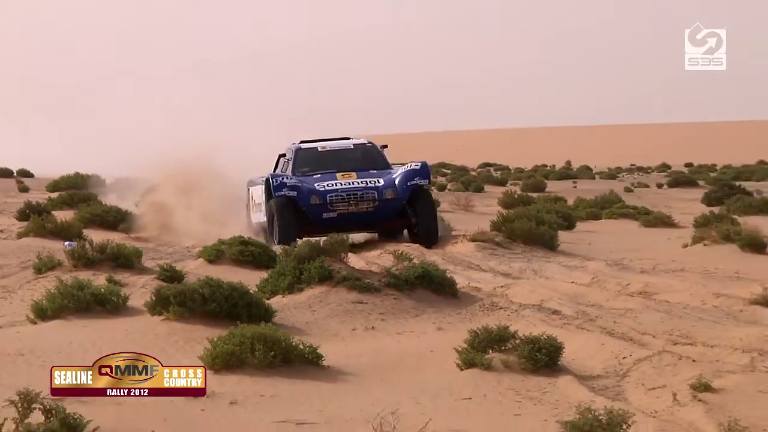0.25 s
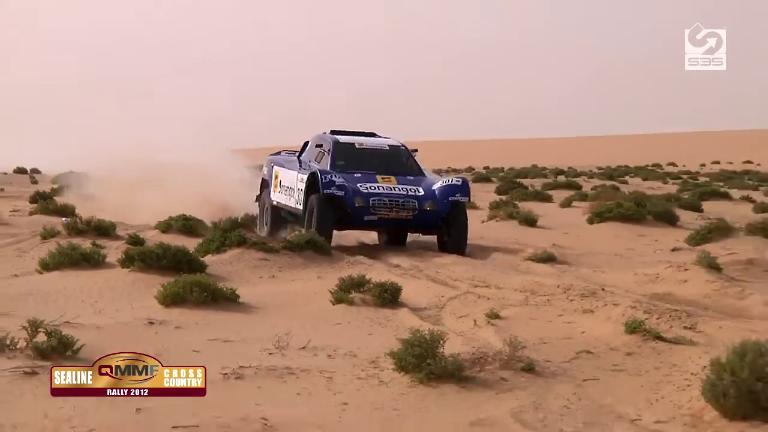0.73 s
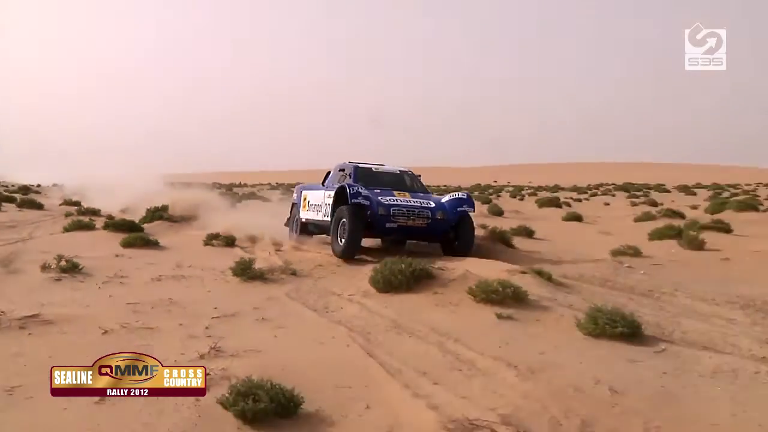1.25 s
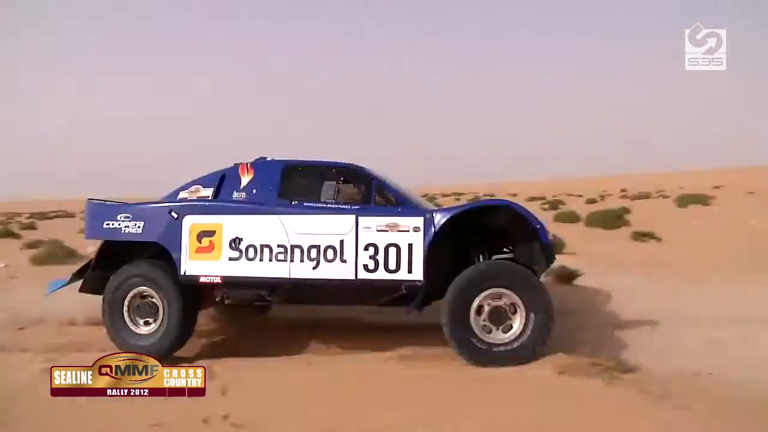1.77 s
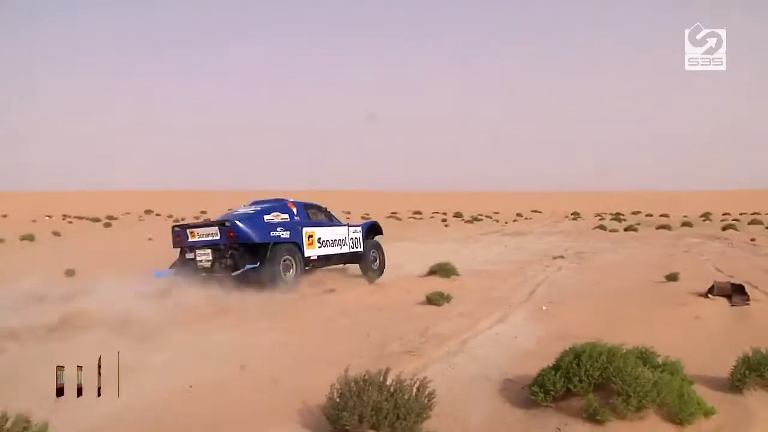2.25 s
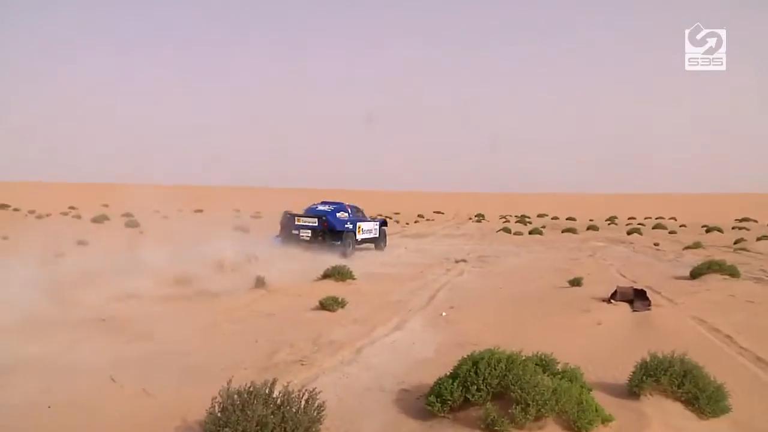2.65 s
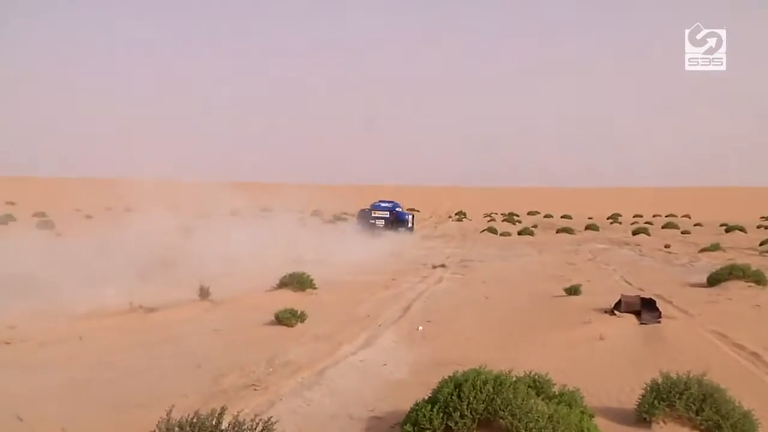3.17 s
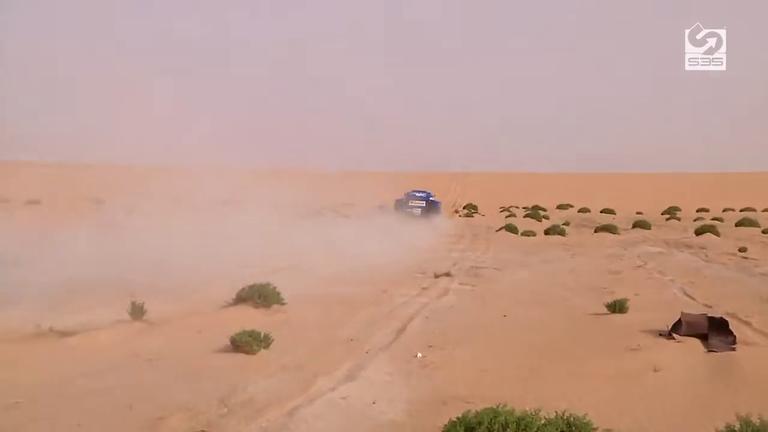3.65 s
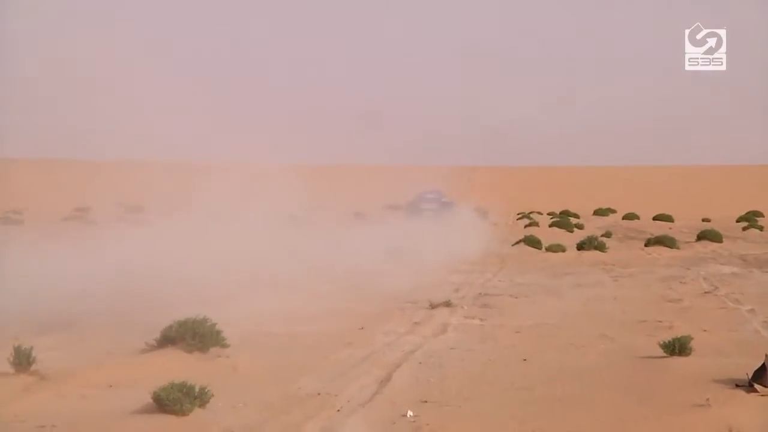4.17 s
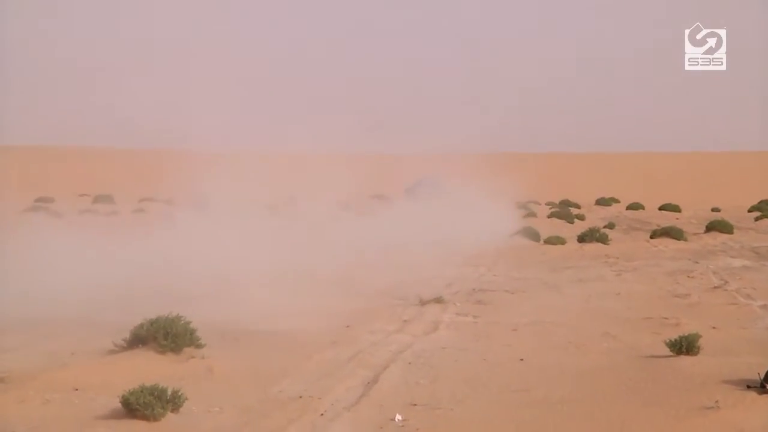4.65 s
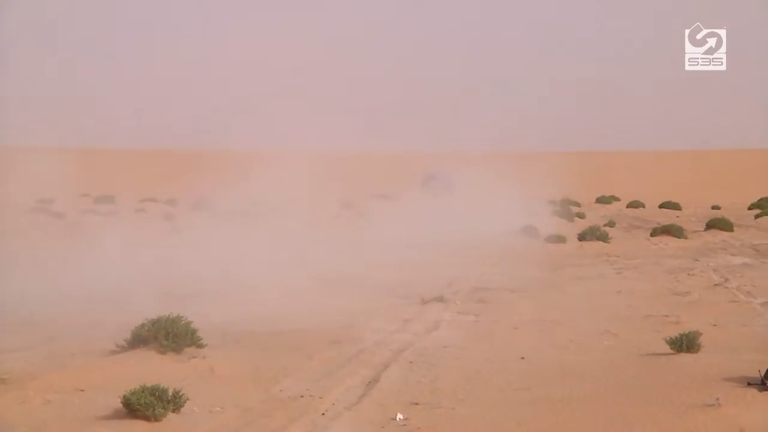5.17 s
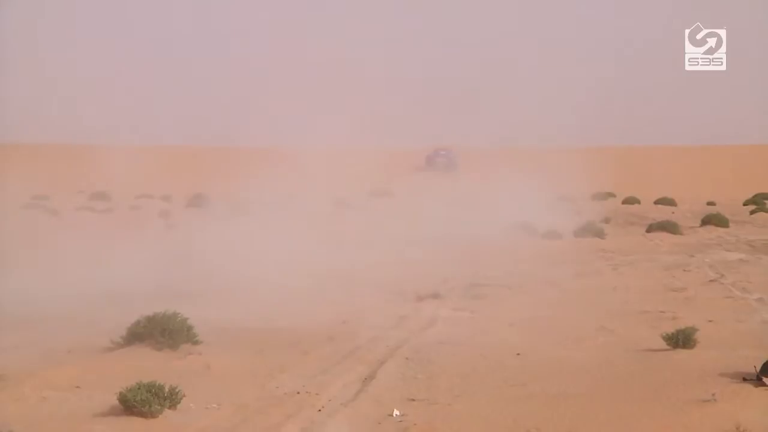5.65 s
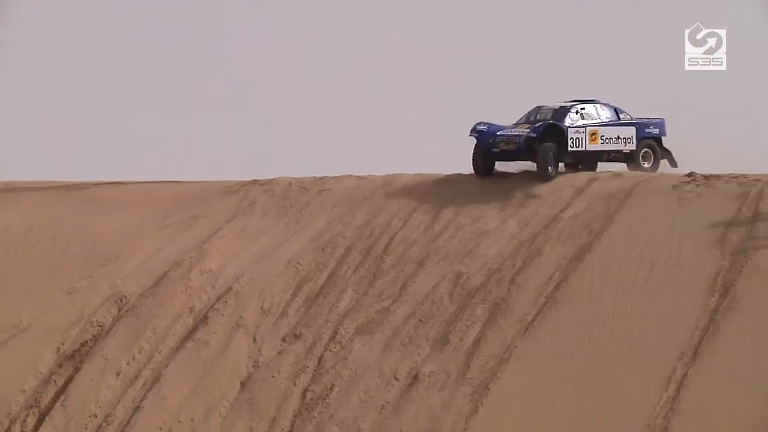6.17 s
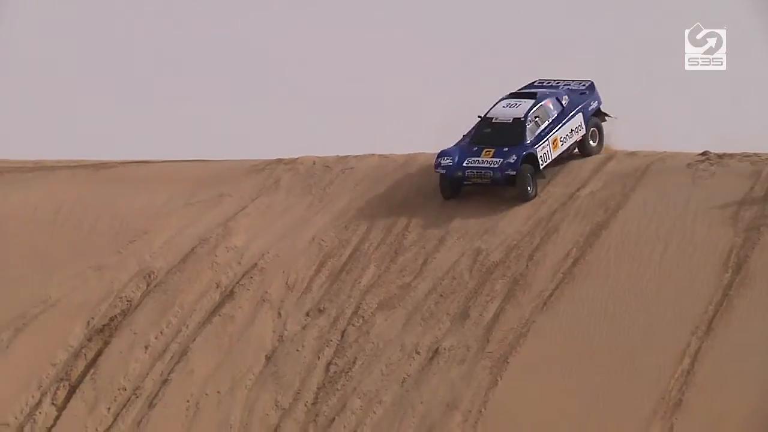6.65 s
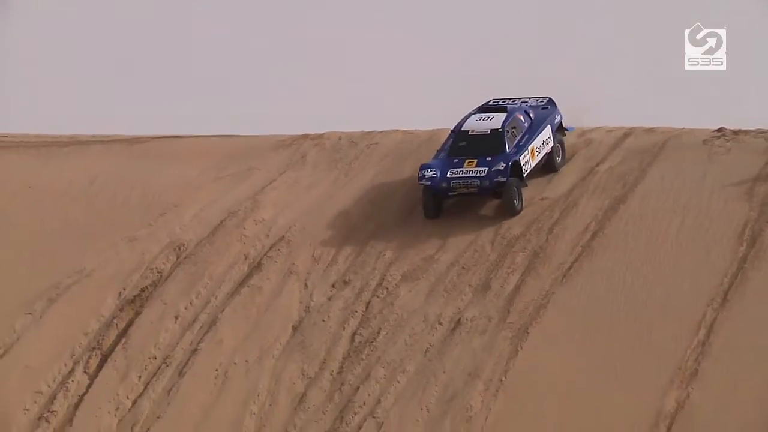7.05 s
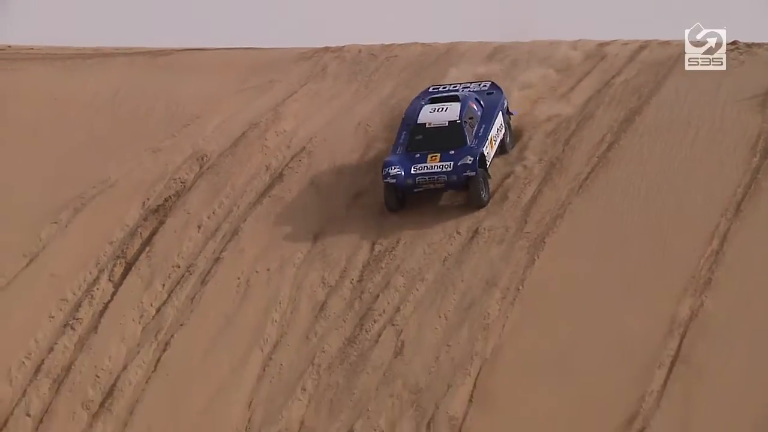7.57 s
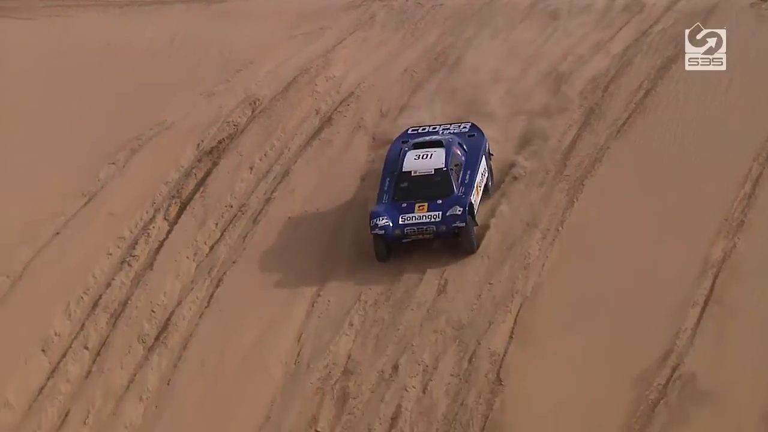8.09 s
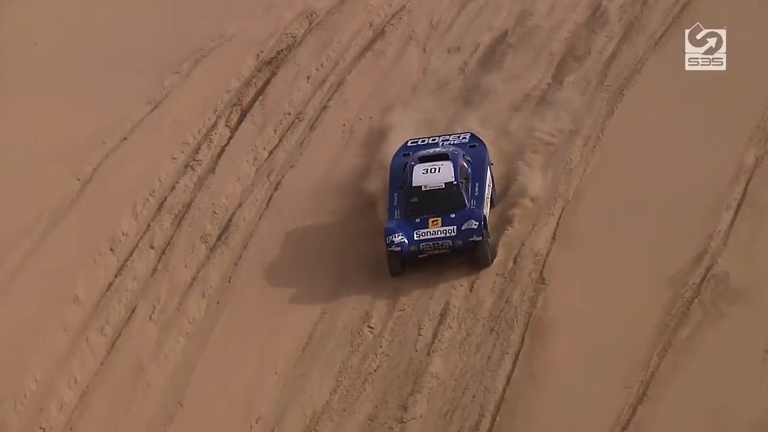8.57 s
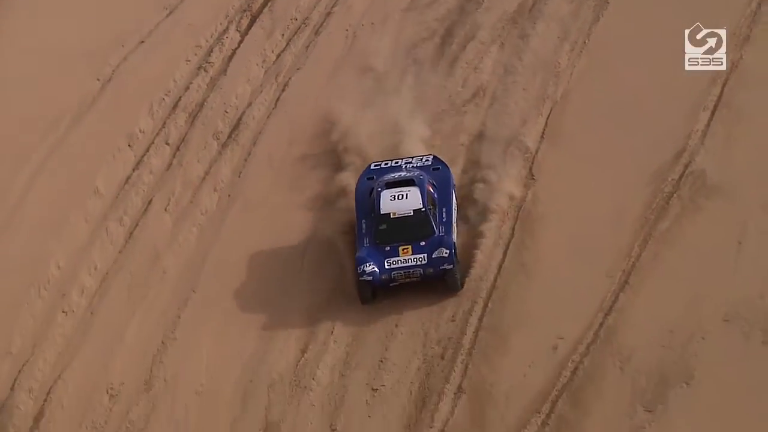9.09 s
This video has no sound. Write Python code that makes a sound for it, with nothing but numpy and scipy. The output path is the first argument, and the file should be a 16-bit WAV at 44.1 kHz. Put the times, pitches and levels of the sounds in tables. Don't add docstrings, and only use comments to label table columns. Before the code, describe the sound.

A V8 off-road race buggy roars toward us over sand, rips past with rasping, crackling exhaust, pulls away with revs surging, then fades to distant low rumble.

```python
import sys
import numpy as np
from scipy import signal
from scipy.fft import rfft, irfft
from scipy.io import wavfile
from scipy.ndimage import uniform_filter1d

SR = 44100
rng = np.random.default_rng(int(sys.argv[2]) if len(sys.argv) > 2 else 0)


def how_loud(loudness_db):
    steps = np.asarray(loudness_db, float) / 20
    return 10 ** steps


def generate_wav(signal):
    frames = np.transpose(np.atleast_2d(signal))
    scaled = np.clip(frames, -1, 1) * 32767
    pcm = np.round(scaled).astype(np.int16)
    wavfile.write(sys.argv[1], SR, pcm)


N = 411453

# (multiple of the four-stroke cycle, level [dB])
FIRING_ORDERS = [(8, -0.76)]
UNEVEN_ORDERS = [(1, -21.5), (2, -20), (3, -9), (4, -23), (5, -3)]
BEAT_ORDERS = [(2, -19), (6, -5), (7, -19), (9, -18), (10, 0.1), (12, -13)]
NEAR_BANK_ORDERS = [(11, -10), (13, -13)]
DUNE_UNEVEN_ORDERS = [(2, -16.5), (3, -11), (4, -24), (5, 1)]
DUNE_BEAT_ORDERS = [(2, -18.5), (4, -1.5), (5, -18.5), (6, 4), (7, -11), (10, 0.5), (11, 1.5), (12, -10.5),
                    (13, -5.5)]
# (multiple of the cycle, level from the front [dB], level from behind [dB])
UPPER_ORDERS = [(11, -12.5, -6), (12, -15, -17.5), (13.12, -18, -12.5), (14, -22.5, -5), (16, -10, -9),
                (18, -28.5, -6), (19.04, -19.5, -18), (20, -30, -33.5), (21, -20.5, -30), (22, -22.5, -25),
                (24, -26.5, -21)]
CYLINDERS_DB = [5, 0, -3, -4, 4, 0, -3, -4]

# (frequency [Hz], density [dB per Hz])
ROAR_SPECTRUM = [(40, -15.5), (90, -3.5), (150, 6.5), (260, 3.5), (350, -1.5), (445, 3.5), (590, -7),
                 (740, -16.5), (1000, -39.5), (1500, -55.5)]
RASP_SPECTRUM = [(400, -20), (700, -5.5), (950, -0.6), (1250, -2.5), (1550, -3.5), (1900, -0.5),
                 (2600, -9.5), (3300, -13), (4800, -27), (5650, -30.5), (6300, -34.5), (9300, -53),
                 (10500, -61), (14300, -76)]
SAND_SPECTRUM = [(900, -9), (1500, -6), (2500, -5), (4000, 0), (5600, -3), (6500, -2), (9400, -15),
                 (10500, -40), (14300, -39)]
DESERT_SPECTRUM = [(25, -21), (60, -14.5), (125, -11), (250, -5.5), (330, -29), (700, -14.5), (1100, -31.5),
                   (2200, -32), (4500, -50), (7000, -80)]
# (frequency [Hz], gain [dB])
PIPE_MOUTH = [(700, 1.5), (2500, 15), (4500, -3), (5650, -8), (6500, -23.5), (9500, -23.5), (11500, -67)]
# (frequency [Hz], gain [dB])
LEFT_DB = [(60, -1.5), (300, -1.45), (700, -1), (1500, 0.9), (3000, -0.5), (6000, 1), (12000, -7.5)]

# (time [s], revs [cycles/s])
PASSING_REVS = [(0, 24.2), (.2, 22.2), (.62, 23.1), (1.1, 23.7), (2.06, 24.2), (2.28, 21), (2.65, 22.75),
                (2.88, 22.2), (3.02, 20.9), (3.15, 20.7), (3.35, 21.6), (3.9, 24.3), (4.45, 23.6),
                (4.98, 22.1), (5.53, 22.4), (5.7, 24.5), (6.29, 27.2), (6.66, 23.4), (7.32, 19.1)]
DUNE_REVS = [(6.4, 7.3), (6.92, 8.7), (7.2, 11.8), (7.36, 19), (7.56, 19.1), (7.79, 21.5), (7.96, 19.9),
             (8.17, 15.1), (9.32, 14.8)]
# (peak time [s], extra revs [cycles/s], rise [s], fall [s])
PASSING_SPINS = [(0.088, 1.2, 0.075, 0.085), (0.292, 0.88, 0.098, 0.063), (.925, 12.1, .27, 0.135),
                 (1.28, 4.74, 0.14, 0.19), (1.789, 4.67, 0.18, 0.097), (1.894, 7.6, 0.06, 0.12),
                 (2.0, 1.5, .04, .05), (2.109, 3.6, 0.049, .06), (2.214, 3.14, 0.051, 0.041),
                 (2.39, 3.06, 0.1, 0.2), (2.521, 2.1, 0.091, 0.052), (2.611, 2.3, 0.049, 0.038),
                 (2.701, 2.7, 0.04, 0.13), (2.779, 1.9, .08, 0.073), (2.92, 1.3, .06, .09),
                 (3.278, 2, 0.13, 0.1), (3.411, 1.6, .05, 0.05), (3.56, 1.14, 0.083, 0.057),
                 (3.778, 4, .16, .07), (4.189, 1.3, 0.11, 0.018), (4.6, 1.5, 0.049, 0.03),
                 (4.679, 3.2, 0.12, 0.087), (4.888, 5.6, 0.18, 0.087), (5.041, 1.78, 0.045, 0.15),
                 (5.311, 5.68, 0.29, .1), (5.473, 0.87, 0.03, 0.042)]
DUNE_SPINS = [
    (8.67, .8, .5, .16),
    (8.98, .7, .12, .1),
    (9.14, .8, .1, .07),
]
# (time [s], level [dB], throttle [0-1])
PASSING_DRIVE = [(0, -19.5, 0.04), (0.139, -25, 0.05), (0.621, -24.5, 0.5), (.76, -22, .6),
                 (1.061, -17.5, 0.4), (1.199, -15.5, 0.5), (1.451, -14.5, 0.9), (1.638, -13.5, 0.86),
                 (2.101, -16.5, 0.98), (2.848, -12, 0.78), (2.949, -10, .05), (3.1, -11, 0.2),
                 (3.269, -7.5, 0.5), (3.397, -13.5, 0.94), (6.198, -12.5, 0.81), (6.431, -14.5, 0.73),
                 (6.621, -15, 0.2), (7.3, -26.5, .05)]
DUNE_DRIVE = [(6.4, -56.5, 0.099), (6.92, -36, 0.056), (7.26, -41, .05), (7.31, -36, 0.64),
              (7.799, -37, 0.94), (7.86, -36, 0.21), (8.04, -40, 0.2), (8.1, -45.5, 0.45),
              (9.32, -49, 0.45)]
# (time [s], echo delay [ms], share of dull far sound [0-1])
PASSING_ECHO = [(0, 3.13, 0.19), (2.8, 2.35, 0.33), (3.401, 1.55, 0.26), (4.501, 1.62, 0.25),
                (5.702, 1.65, 0.37), (6.199, 2.1, 0.68), (6.7, 2.35, 0.53), (7.0, 2.4, 0.7)]
DUNE_ECHO = [(6.4, 0.93, 0.5), (7.199, 1.3, 0.34), (7.5, 1.94, 0.35), (8.0, 1.73, 0.42), (8.5, 1.6, 0.36),
             (9.3, 0.8, 0.38)]
# (level [dB], off-throttle loss [dB], gain above cruising revs [dB per cycle/s])
FROM_FRONT = [(-4, 2.7, 0), (0, 15, .5), (-16, 10.5, 0.57), (-4.5, 6, -0.23), (-20, 11, -0.24)]
FROM_BEHIND = [(0.47, 3.9, -0.69), (-28.5, 8.5, 1.9), (-10.5, 12, 1.5), (-10.5, 10, -0.73),
               (-11.5, 26.4, -0.35)]
ON_CREST = [(0.4, 1.5, -.1), (-0.5, 9, .1), (-19.5, 2.5, .1), (-11.5, -4.5, .1), (-19, 11, .1)]
DOWN_SLOPE = [(1, .1, .1), (-9, 3.6, .1), (-8, .1, .1), (-3.5, 1.1, .1), (-16.5, 20.3, .1)]

# (time [s], span [s], gain [dB])
STABS = [
    (.37, 0.031, -3),
    (.665, 0.033, -25),
    (.77, 0.035, 8.5),
    (1.07, 0.089, -13),
    (1.3, 0.1, -3.5),
    (1.67, 0.059, 7),
    (2.1, 0.033, -1.5),
    (3.02, 0.039, -3),
]
# (time [s], span [s], gain [dB])
RASP_SWELLS = [
    (.01, 0.022, -1),
    (1.86, 0.037, 1.5),
    (3.9, 0.033, 1.5),
    (4.86, 0.065, 4),
    (5.17, 0.23, -2),
]
# (time [s], span [s], gain [dB])
DUNE_BLIPS = [
    (8.35, 0.13, 13.5),
    (8.95, 0.26, 15),
]
# (time [s], level [dB])
NEAR_BANK_DB = [(1.3, -21.5), (1.5, -2), (1.65, 0), (1.82, 4), (1.92, -18.5), (2.0, 2), (2.3, 5.5),
                (2.65, 9), (2.95, 8), (3.12, 2), (3.3, -10)]
# (time [s], span [s], gain [dB])
UNEVEN_SWELLS = [(1.55, 0.044, 2), (2.05, 0.1, 4), (2.35, .05, 1), (2.68, 0.18, 3.5), (3.04, 0.063, 7)]
# (time [s], span [s], gain [dB])
BEAT_SWELLS = [(1.32, .08, -7), (1.72, 0.14, -10), (1.97, 0.096, -6.5), (2.5, 0.28, -4.5)]
HARD_FIRINGS_S = [2.41, 2.432, 2.452, 2.474, 2.493, 2.514, 2.532, 2.554, 2.574, 2.595, 2.614, 2.636, 2.68,
                  2.698, 2.719, 2.776, 2.84]
# (time [s], span [s], frequency [Hz], gain [ratio])
BAND_SWELLS = [(1.802, 0.16, 1000, 0.7), (1.9, 0.017, 695, 3.2), (2.062, 0.14, 1020, 1.8),
               (2.6, 0.059, 1500, 1.5), (2.202, 0.24, 230, 0.5), (5.14, 0.25, 1590, 1.8), (2.2, 1, 330, -0.53),
               (3, 0.16, 380, -0.64),
               (.82, .1, 450, 0.51), (.93, .06, 174, 0.41), (1.3, 0.24, 445, 0.41), (1.8, 0.17, 547, -.7),
          (1.97, .04, 225, -0.65), (.85, .1, 720, -0.92), (2.75, 0.24, 680, -0.63), (3.1, .09, 215, 1.06),
          (3.1, 0.24, 345, -0.2), (3.35, 0.12, 1020, -1.1), (6.1, .45, 440, -0.25), (6.9, .3, 720, 1.2),
          (7.05, .15, 480, -0.51)]

# (time [s], peak [dB], ring [Hz])
BACKFIRES = [(2.392, -9.5, 1300), (2.4108, -13, 1740), (2.4325, -15.5, 2200), (2.4516, -13, 1770),
             (2.4766, -14, 1665), (2.4923, -17.5, 1708), (2.5127, -12, 1334), (2.5316, -13.5, 1850),
             (2.5377, -14, 1880), (2.5534, -10, 1744), (2.5745, -14, 2460), (2.5955, -17, 1880),
             (2.6185, -19.5, 1820), (2.636, -11.5, 2340), (2.664, -11, 2070), (2.6798, -10, 2240),
             (2.6976, -11.5, 1330), (2.72, -9, 1766), (2.744, -17, 1740), (2.7579, -15, 1916),
             (2.7762, -13.5, 2060), (2.7968, -17, 2115), (2.8167, -15.5, 1960), (2.8384, -11.5, 1990),
             (2.8515, -15.5, 2300), (2.8677, -18.5, 2127), (2.8831, -19.5, 1990), (2.9053, -27, 2100)]
FAR_BACKFIRES = [(3.3, -13, 830), (3.3797, -14, 1795), (3.5671, -12.5, 1588), (3.6073, -18, 1100),
                 (3.6322, -11.5, 1786), (3.6749, -12.5, 855), (3.6947, -16, 948), (3.7157, -13, 1560),
                 (3.8301, -13, 1985), (3.8441, -20, 825), (3.8844, -10.5, 924), (3.928, -14, 1920),
                 (3.9486, -13.5, 1793), (4.008, -21.5, 830), (4.0522, -16, 1827), (4.0758, -15, 1875),
                 (3.9693, -22, 1900), (4.0303, -20, 2380), (4.0956, -13, 1760), (4.252, -22.5, 834),
                 (4.2798, -20.5, 808), (4.3139, -15, 908), (4.3585, -9.5, 844), (4.397, -20, 1950),
                 (4.44, -18.5, 936), (4.5085, -20.5, 1050), (4.5261, -16.5, 835), (4.568, -17, 1000),
                 (4.6478, -14.5, 1142), (4.686, -16.5, 992), (4.7481, -29, 931), (4.7725, -16, 1530),
                 (4.8269, -15, 972), (4.8449, -14.5, 1093), (5.0026, -14, 841), (5.087, -11.5, 1140),
                 (5.1102, -25, 807), (5.127, -19.5, 1167), (5.1462, -33, 953), (5.1693, -13.5, 1673),
                 (5.206, -23, 937), (5.5256, -12, 1534), (5.552, -15.5, 891), (5.7359, -14.5, 953),
                 (5.759, -14, 2650), (5.778, -14.5, 907), (5.8041, -17, 1330), (5.8203, -13, 1577),
                 (5.86, -29.5, 877), (5.902, -18, 982), (5.9396, -16, 950), (5.9789, -16, 962),
                 (5.9214, -21, 2380), (6.0186, -23, 1790), (6.0941, -21.5, 1900), (6.1346, -20, 1130),
                 (6.1727, -23, 1040), (6.209, -21, 968), (6.2471, -26.5, 1060), (6.3383, -34, 1130)]
CLOSE_CRACKS = [(1.8848, -17.5, 1910), (1.9361, -19, 1543), (1.9483, -16.5, 1573), (1.9723, -18, 1387),
                (1.9862, -19.5, 1800), (2.0115, -11, 1203), (2.0254, -17, 1408), (2.0375, -11.5, 1537),
                (2.0504, -15, 1993), (2.0653, -14, 2416), (2.078, -13, 1500), (2.0907, -13.5, 1522),
                (2.1041, -16, 1400), (2.1129, -11.5, 1490), (2.1275, -10, 1325), (2.1425, -12, 1385),
                (2.173, -13.5, 1800), (2.1812, -14.5, 1455), (2.2134, -12, 1560), (2.2308, -12, 1500),
                (2.2386, -16, 1930), (2.2607, -18.5, 1357), (2.2883, -12.5, 1420), (2.2953, -14, 2510),
                (2.3101, -20.5, 2554), (2.3274, -17, 1365), (2.3344, -17.5, 1353), (2.3494, -10.5, 1346),
                (2.3685, -12, 1320)]
# (time [s], peak [dB])
SNAPS = [(1.532, -37), (1.8622, -29), (1.9486, -39.5), (2.1063, -34), (2.1733, -38), (2.2607, -39),
         (2.2932, -36), (2.3923, -40), (2.4745, -43.5), (2.5161, -41), (2.5524, -36.5), (2.6624, -38),
         (2.7174, -37), (2.7774, -40)]

# (time [s], tick [dB], tick T60 [s], thud [dB])
KNOCKS = [
    (0, -38, .002, -60),
    (1.534, -37, 0.15, -52),
    (1.864, -21, .003, -15),
]
# (time [s], frequency [Hz], level [dB])
GEAR_WHINE = [(.5, 4200, -80), (.8, 4300, -69), (1.1, 4280, -68), (1.35, 4230, -76)]
# (time [s], level [dB])
SPRAY_DB = [(.6, -77.5), (1.2, -71), (1.5, -64.5), (1.8, -59.5), (2.05, -49.5), (2.3, -52.5), (2.6, -58),
            (2.85, -69), (2.95, -74), (3.4, -68.5)]


def passing():
    t = np.arange(N) / SR
    hop_s, hop_span_s, hop_hz, hop_revs = 4.2, .25, 10.2, 1.9
    hop = swells([(hop_s, hop_span_s, hop_revs)]) * np.cos(2 * np.pi * hop_hz * (t - hop_s))
    speed = crank(PASSING_REVS, PASSING_SPINS) + hop
    db, gate = layers(speed, PASSING_DRIVE, (FROM_FRONT, FROM_BEHIND), turn_s=(1.92, 3.87))

    hidden_s, hiding_s, hidden_db = 6.82, .045, [20, 12, 1.9, 11, 5.3]
    db = db - np.outer(hidden_db, .5 + .5 * np.tanh((t - hidden_s) / hiding_s))
    closest_s, close_span_s, close_db = 2.35, 0.5, [.1, .1, 9.5, 0.092, 6.94]
    db = db + np.outer(close_db, swells([(closest_s, close_span_s, 1)]))

    pipe_top_hz, pipe_loss_db_per_hz = 219.8, 0.5
    above_pipe_hz = np.maximum(8 * speed - pipe_top_hz, 0) * np.clip((1.97 - t) / .08, 0, 1)
    db[0] += swells(STABS) - pipe_loss_db_per_hz * above_pipe_hz
    recedes_s, roar_loss_db_per_s = 4.16, 4.5
    db[3] -= roar_loss_db_per_s * np.maximum(t - recedes_s, 0)
    db[4] += swells(RASP_SWELLS)

    (near_db,), near = in_time(NEAR_BANK_DB)
    uneven_db, beat_db = swells(UNEVEN_SWELLS), swells(BEAT_SWELLS)
    uneven = [(multiple, level_db + uneven_db) for multiple, level_db in UNEVEN_ORDERS]
    uneven += [(multiple, bank_db + near_db - 40 * (1 - near)) for multiple, bank_db in NEAR_BANK_ORDERS]
    beat = [(multiple, level_db + beat_db) for multiple, level_db in BEAT_ORDERS]
    cracks_s = np.array(HARD_FIRINGS_S + [s for s, *_ in FAR_BACKFIRES[2:]])
    car = engine(speed, db, gate, uneven, beat, PASSING_ECHO,
                 echo_share=-0.2, low_cut_hz=63, ring=2.2, cracks_s=cracks_s)
    return swell_bands(car)


def on_dune():
    speed = crank(DUNE_REVS, DUNE_SPINS)
    db, gate = layers(speed, DUNE_DRIVE, (ON_CREST, DOWN_SLOPE), turn_s=(7.95, 8.15))
    db[4] += swells(DUNE_BLIPS)
    return engine(speed, db, gate, DUNE_UNEVEN_ORDERS, DUNE_BEAT_ORDERS, DUNE_ECHO,
                  echo_share=0.72, low_cut_hz=58, ring=0)


def engine(speed, layers_db, gate, uneven, beat, path, echo_share, low_cut_hz, ring, cracks_s=None):
    firing_db, uneven_db, beat_db, roar_db, rasp_db = layers_db
    cycles = np.cumsum(speed) / SR
    if cracks_s is not None:
        cycles = in_step(cycles, np.sort(cracks_s))

    tones = how_loud(firing_db) * orders(cycles, FIRING_ORDERS, flutter_db=.5, wander=.08, ring=ring)
    tones += how_loud(uneven_db) * orders(cycles, uneven, flutter_db=1.1, wander=.15, ring=ring)
    tones += how_loud(beat_db) * orders(cycles, beat, flutter_db=.9, wander=.12, ring=ring)
    tones = signal.sosfilt(signal.butter(2, low_cut_hz, "high", fs=SR, output="sos"), tones)
    front = 1 / (1 + how_loud(uniform_filter1d(beat_db - uneven_db, size=SR // 3)))
    upper_table = [(round(k), behind_db + front * (front_db - behind_db))
                   for k, front_db, behind_db in UPPER_ORDERS]
    upper = orders(cycles, upper_table, flutter_db=1.3, wander=.2, ring=ring)

    fired = np.flatnonzero(np.diff(np.floor(8 * cycles)))
    cylinder = (8 * cycles[fired + 1]).astype(int) % 8
    scatter_db = 1.6 * rng.standard_normal(N // 100)[:len(fired)]
    puffs = np.zeros(N)
    puffs[fired] = how_loud(np.take(CYLINDERS_DB, cylinder) + scatter_db)
    gusts = rms_one(decay(puffs, t60_s=0.025))

    roar = rms_one(colour(rng.standard_normal(N) * (0.79 + gusts), ROAR_SPECTRUM))
    gas = rng.standard_normal(N) * (0.025 + 1.94 * front ** 2 + gusts)
    rasp = rms_one(colour(gas - .52 * (1 - front) * rms_one(puffs), RASP_SPECTRUM))
    dull = rms_one(signal.sosfilt(signal.butter(2, 950, fs=SR, output="sos"), rasp))
    echo_ms, far = in_time(path)[0]
    rasp += np.clip(far, 0, 1) * (dull - rasp)

    bright = how_loud(roar_db) * (upper + how_loud(5 * front - 7) * roar) + how_loud(rasp_db - .7) * rasp
    late = np.interp(np.arange(N) - echo_ms * SR / 1000, np.arange(N), bright)
    return gate * (tones + bright + echo_share * late)


def orders(cycles, table, flutter_db, wander, ring):
    out = 0
    for multiple, db in table:
        spread = ring * (np.exp(-((multiple - 10.2) / 1.6) ** 2) - .15) - np.pi / 2 * (multiple % 2)
        phase = 2 * np.pi * multiple * cycles[::8] - spread + wander * drift(28, size=8)
        level_db = np.broadcast_to(db, N)[::8] + flutter_db * drift(8.9, size=8)
        out = out - how_loud(level_db) * np.sqrt(2) * np.sin(phase)
    return signal.resample_poly(out, 8, 1)[:N]


def crank(revs, spins):
    t, steps = np.arange(0, N, 32) / SR, np.linspace(-1, 1, num=21)
    bump = np.cos(np.pi * steps / 2) ** 2
    racing = 0
    for s, extra, rise_s, fall_s in spins:
        racing = racing + extra * np.interp(t, s + steps * np.where(steps < 0, rise_s, fall_s), bump)
    return in_time(revs)[0][0] + np.interp(np.arange(N) / SR, t, racing)


def in_step(cycles, cracks_s):
    reach_s = .09
    off = np.exp(4j * np.pi * cycles[(cracks_s * SR).astype(int)])
    weights = np.exp(-np.abs(cracks_s[:, None] - cracks_s) / reach_s)
    turns = np.unwrap(np.angle(weights @ off)) / (4 * np.pi)
    return cycles - uniform_filter1d(np.interp(np.arange(N) / SR, cracks_s, turns), size=SR // 8)


def layers(speed, drive, sides, turn_s):
    cruise_revs = 24.1
    (level_db, throttle), gate = in_time(drive)
    shown = []
    for side in sides:
        db, loss_db, above_db = np.transpose(side)[:, :, None]
        load_db = above_db * np.maximum(speed - cruise_revs, 0) - loss_db * (1 - np.clip(throttle, 0, 1))
        shown.append(db + load_db)
    turned = np.interp(np.arange(N) / SR, turn_s, [0, 1])
    return level_db + shown[0] + turned * (shown[1] - shown[0]), gate


def swell_bands(car):
    out = car.copy()
    for s, span_s, hz, gain in BAND_SWELLS:
        near = np.arange(max(int((s - 3 * span_s) * SR), 0), int((s + 3 * span_s) * SR))
        band = signal.lfilter(*signal.iirpeak(hz, 5, fs=SR), car[near])
        out[near] += gain * np.exp(-((near / SR - s) / span_s) ** 2) * band
    return out


def backfires():
    after = np.arange(800) / SR
    rings, wisps, snaps = np.zeros(N + 800), np.zeros(N + 800), np.zeros(N)
    # (shocks, ring [dB], wisp [dB], wisp T60 [s])
    for rows, ring_db, wisp_db, wisp_s in ((BACKFIRES, -3.5, -3, .008), (FAR_BACKFIRES, -4, -10.5, .008),
                                           (CLOSE_CRACKS, -5, -8, .022)):
        for s, peak_db, ring_hz in rows:
            start = int(s * SR)
            envelope = (1 - np.exp(-after / .00012)) * how_loud(-60 * after / .013)
            ring = -np.sin(2 * np.pi * ring_hz * after) * envelope
            rings[start:][:len(after)] += how_loud(peak_db + ring_db) * ring
            wisp = .55 * rng.standard_normal(len(after)) * how_loud(peak_db + wisp_db - 60 * after / wisp_s)
            wisps[start:][:len(after)] += wisp

    snap_t60_s, snap_gain_db, crack_snap_db = 0.007, -1.5, -23.5
    for s, peak_db in SNAPS + [(s, db + crack_snap_db) for s, db, _ in CLOSE_CRACKS]:
        snap = rng.standard_normal(len(after)) * how_loud(peak_db + snap_gain_db - 60 * after / snap_t60_s)
        snaps[int(s * SR):][:len(after)] += snap
    snap_band = signal.butter(2, [4500, 8980], "band", fs=SR, output="sos")
    return rings[:N] + colour(wisps, PIPE_MOUTH) + signal.sosfilt(snap_band, snaps + 1e-18)


def chassis():
    out, t = np.zeros(N), np.arange(N) / SR
    rattle_db = [(1500, -12.5), (4000, 15.5), (8000, -3.5), (10000, -18.0), (14000, -10.0)]
    rattle = rms_one(colour(rng.standard_normal(N), rattle_db))
    for s, tick_db, t60_s, thud_db in KNOCKS:
        after = np.maximum(t - s, 0)
        tick = rattle * how_loud(tick_db - 60 * after / t60_s)
        thud = how_loud(thud_db - 60 * after / 0.044) * np.sin(2 * np.pi * 32 * after)
        out += (t >= s) * (tick + thud)
    (whine_hz, whine_db), gate = in_time(GEAR_WHINE)
    return out + gate * how_loud(whine_db) * np.sin(2 * np.pi * np.cumsum(whine_hz) / SR)


def sand():
    (spray_db,), gate = in_time(SPRAY_DB, fade_s=0.51)
    grains_per_s = 300
    grain_db = 4.5 * np.minimum(rng.exponential(1, N), 4)
    grains = (rng.random(N) < grains_per_s / SR) * how_loud(grain_db)
    lumps = 1.8 + rms_one(decay(grains, t60_s=.03))
    mid = rms_one(colour(rng.standard_normal(N) * lumps, SAND_SPECTRUM))
    side = rms_one(colour(rng.standard_normal(N) * lumps, SAND_SPECTRUM))
    return gate * how_loud(spray_db + 4.5) * (0.93 * mid + side * [[.75], [-1.25]])


def desert_air():
    air = rms_one(colour(rng.standard_normal(N), DESERT_SPECTRUM))
    return how_loud(-53) * how_loud(1.2 * drift(4)) * air


def in_time(rows, fade_s=.02):
    s, *columns = np.transpose(rows)
    t = np.arange(N) / SR
    gate = np.clip(np.minimum(t - s[0] + fade_s, s[-1] + fade_s - t) / fade_s, 0, 1)
    return [np.interp(t, s, c) for c in columns], gate


def swells(rows):
    t = np.arange(0, N, 32) / SR
    total = sum(height * np.exp(-((t - s) / span_s) ** 2) for s, span_s, height in rows)
    return np.interp(np.arange(N) / SR, t, total)


def drift(rate_hz, size=1):
    r = np.exp(-80 * np.pi * rate_hz / SR)
    slow = signal.lfilter([1], [1, -2 * r, r * r], rng.standard_normal(N // 40 + 2002))[2000:]
    return np.interp(np.arange(0, N, size) / 40, np.arange(len(slow)), rms_one(slow))


def decay(clicks, t60_s):
    return signal.lfilter([1], [1, -how_loud(-60 / (t60_s * SR))], clicks + 1e-18)


def colour(x, spectrum):
    hz, db = np.transpose(spectrum)
    grid_hz = np.maximum(np.arange(4097) * SR / 8192, 1)
    cepstrum = irfft(np.interp(np.log(grid_hz), np.log(hz), db) * np.log(10) / 20)
    cepstrum[1:4096] *= 2
    cepstrum[4097:] = 0
    return signal.fftconvolve(x, irfft(np.exp(rfft(cepstrum))))[:N]


def rms_one(x):
    return x / np.sqrt(np.mean(x ** 2) + 1e-20)


def scene():
    middle = passing() + on_dune() + backfires() + chassis() + desert_air()
    return np.array([middle, middle]) + sand()


def band_limit(x):
    return signal.sosfilt(signal.butter(12, 14400, fs=SR, output="sos"), x)


def record(dry):
    housing_dip_hz, hiss_db = 5660, -73
    dry = signal.lfilter(*signal.iirnotch(housing_dip_hz, 11, fs=SR), dry)
    left = colour(dry[0], [(hz, db / 2) for hz, db in LEFT_DB])
    right = colour(dry[1], [(hz, -db / 2) for hz, db in LEFT_DB])
    x = np.array([left, right]) + how_loud(hiss_db) * rng.standard_normal((2, N))
    rounded = 1.602 * np.tanh(x / 1.162)
    mix = signal.sosfilt(signal.cheby2(10, 50, 14800, fs=SR, output="sos"), rounded)
    return band_limit(mix)


dry = scene()
out = record(dry)
generate_wav(out)
```